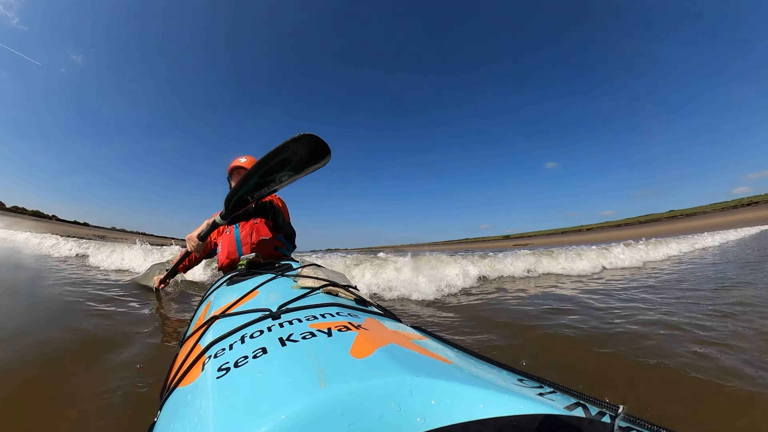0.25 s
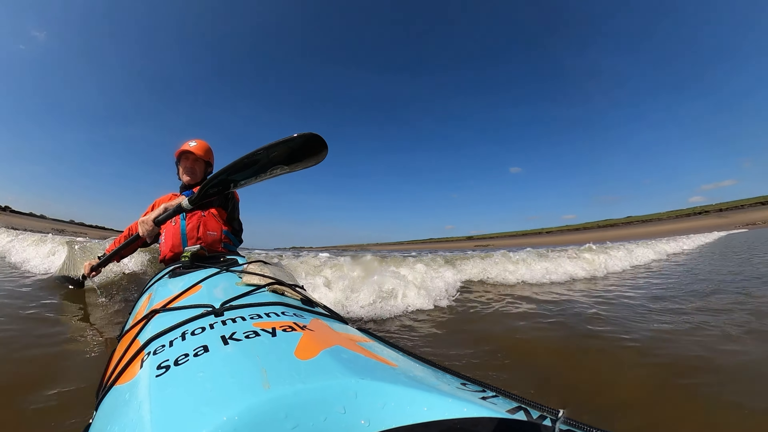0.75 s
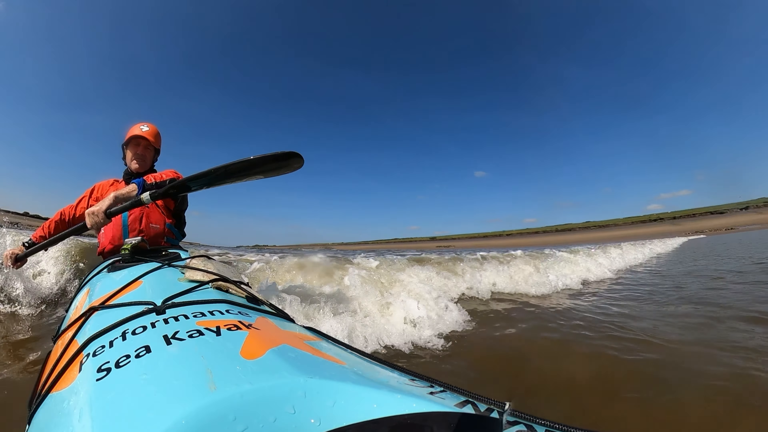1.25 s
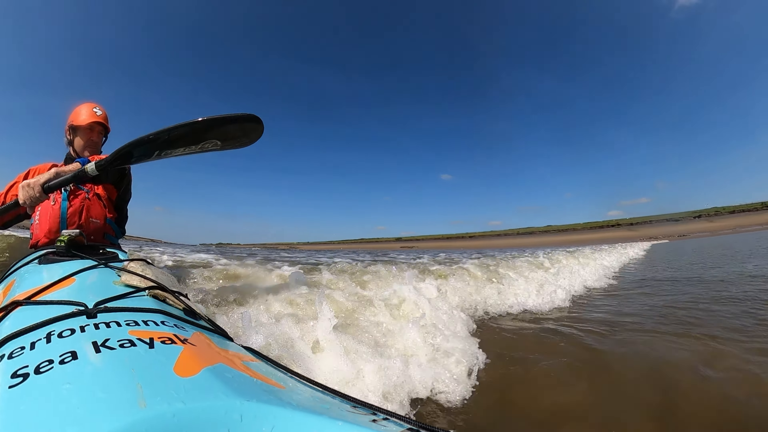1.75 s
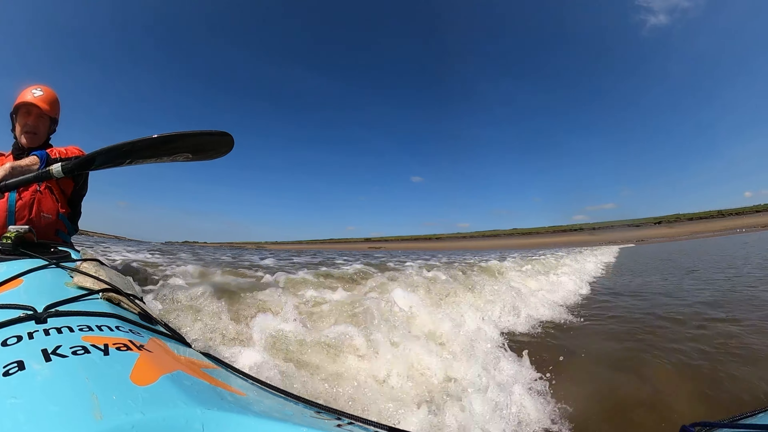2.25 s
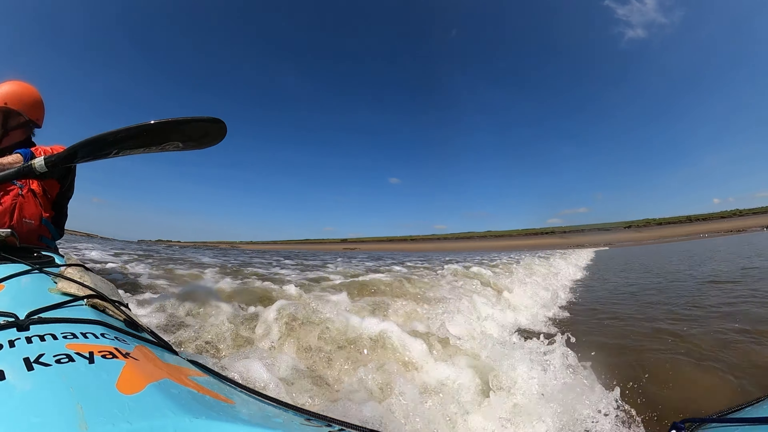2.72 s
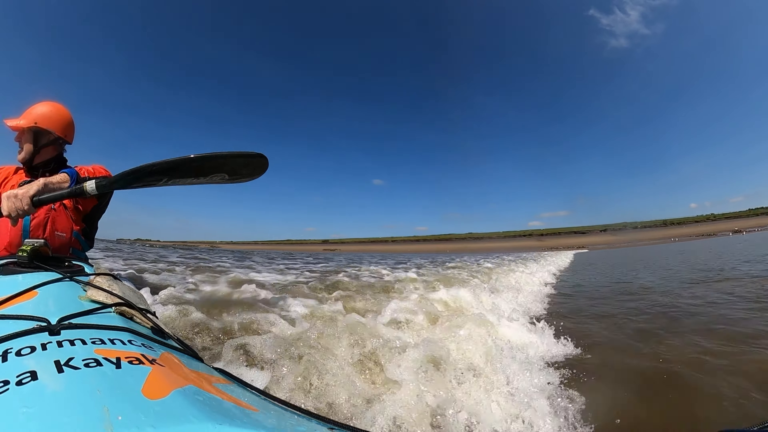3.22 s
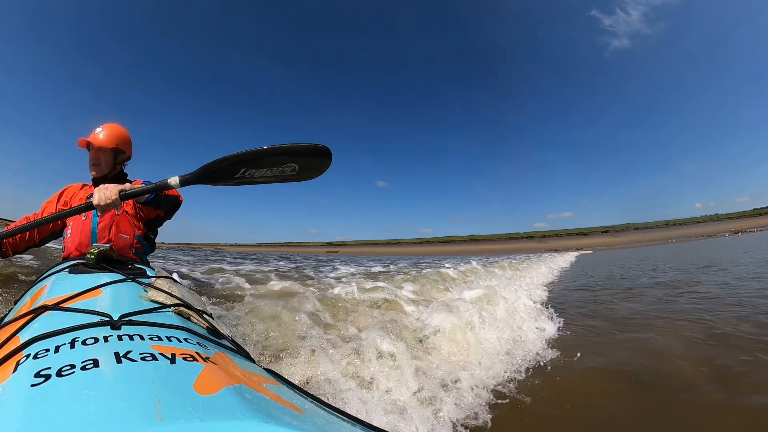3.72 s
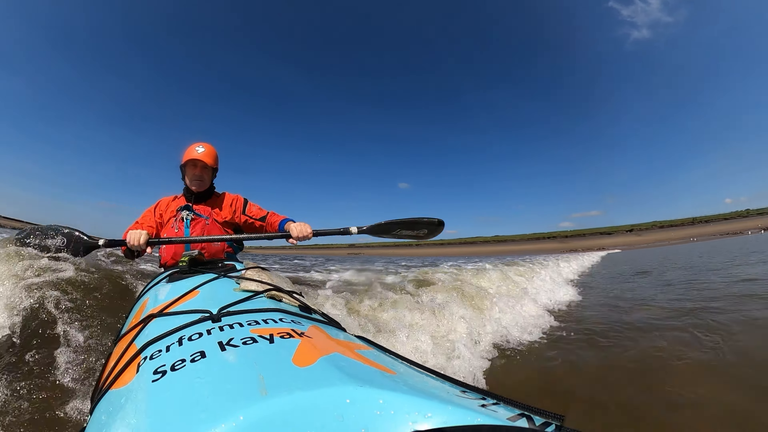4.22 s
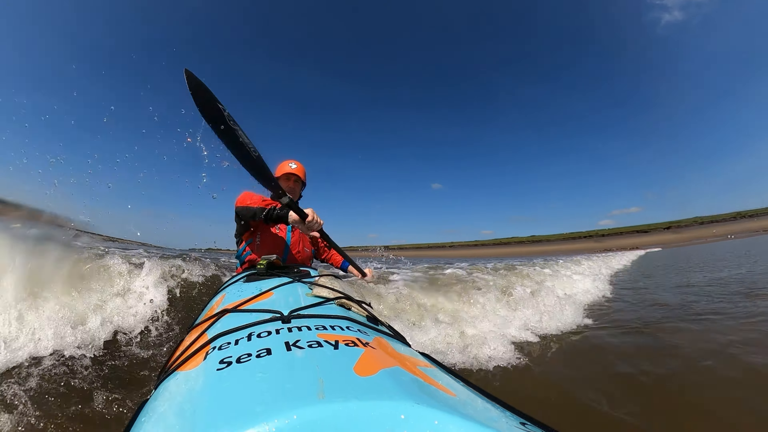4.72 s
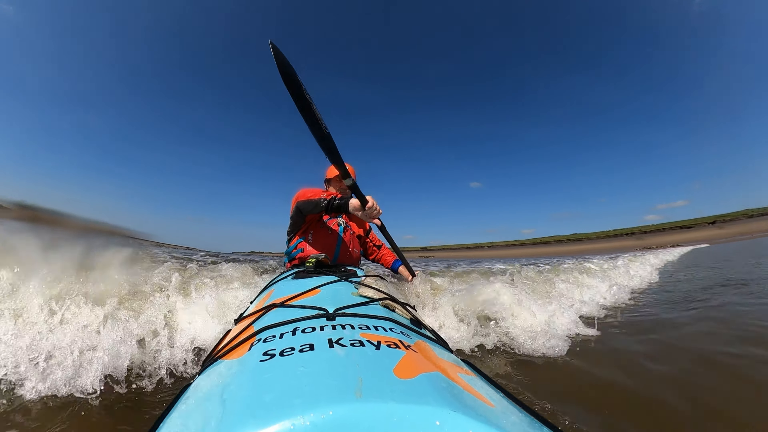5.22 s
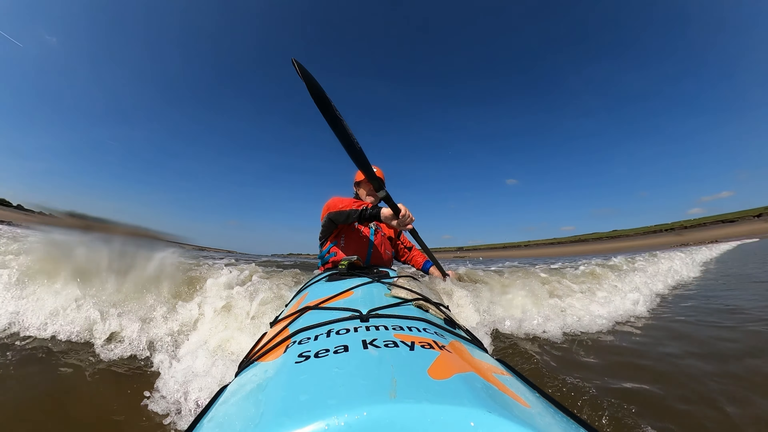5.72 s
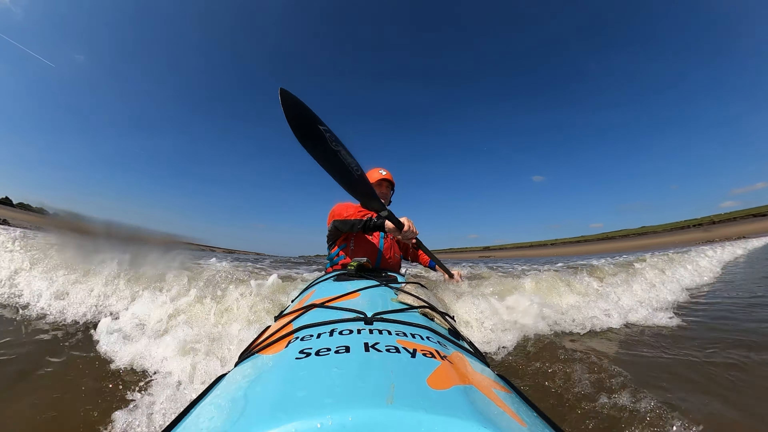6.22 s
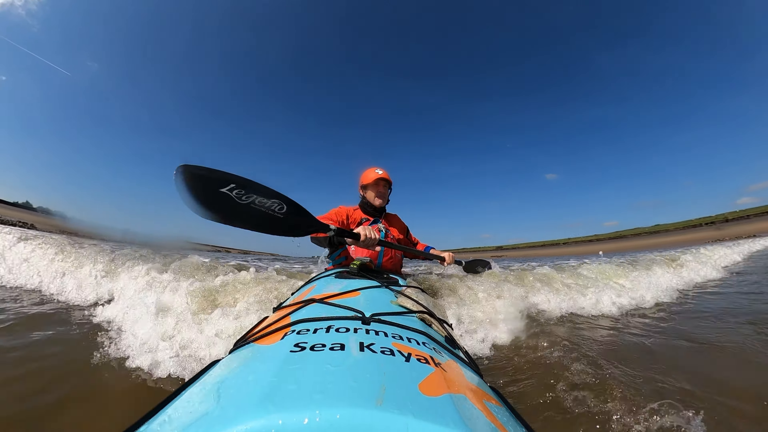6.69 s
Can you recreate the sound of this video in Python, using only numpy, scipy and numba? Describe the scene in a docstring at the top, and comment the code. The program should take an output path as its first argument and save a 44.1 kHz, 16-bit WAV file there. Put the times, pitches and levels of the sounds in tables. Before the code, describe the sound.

A dense, muffled foamy rush surrounds a microphone mounted on a kayak deck. Low bubbling and gurgling grow as the crest passes, with brief splashes and faint fizz, while surf hisses softly beyond. From about three seconds, wind buffeting becomes heavier, with low thuds; the water keeps roaring outdoors until the end.

```python
"""Foam roars from the start, a cloud of ringing bubbles, as a small breaking wave overtakes and carries a sea kayak.
Trapped air churns and gulps beside the hull, damped oscillations of rising pitch; spray fizzes as the crest passes.
Splashes and mist are shorter bubble clouds; drops tick on the wet housing of a microphone on the deck.
Gusts, as coloured noise, and hard eddies, as single damped pulses, buffet that microphone; surf hisses further off."""
import sys
import numpy as np
from scipy import signal
from scipy.fft import rfft, irfft, next_fast_len
from scipy.io import wavfile
from scipy.ndimage import uniform_filter1d
from numba import njit

SR = 44100
rng = np.random.default_rng(int(sys.argv[2]) if len(sys.argv) > 2 else 0)


def store_pcm(level_fs):
    """Save levels as 16-bit WAV."""
    pcm = np.round(np.clip(level_fs, -1, 1) * 32767).astype(np.int16)
    wavfile.write(sys.argv[1], SR, np.atleast_2d(pcm).T)


N = 306495
TIME = np.arange(N) / SR

# spectrum of the surf line further off: (frequency [Hz], relative density [dB])
FAR_SURF_SPECTRUM = [(1500, -5), (2900, -5.5), (4000, -2.5), (4700, -12.5), (5800, -15), (7600, -21.5),
                     (8600, -40)]
# spectrum of the wind buffeting: (frequency [Hz], relative density [dB])
WIND_SPECTRUM = [(6, -17), (14, 0.5), (22, -2.5), (32, -7), (45, -2.5), (62, -6), (90, -8.5), (130, -13),
                 (250, -38), (600, -43.5)]
# gusts on the microphone: (time of height [s], length [s], level at height [dB])
GUST_EVENTS = [(0.16, 0.22, -37.5), (1.43, 0.13, -39), (1.633, 0.22, -32.5), (2.68, 0.15, -33.5),
               (2.978, 0.64, -35), (3.26, 0.21, -29.5), (3.38, 0.23, -30.5), (3.557, 0.6, -36.5),
               (3.861, 0.21, -31.5), (4.03, 0.34, -32.5), (4.284, .15, -26.5), (4.45, 0.24, -29.5),
               (4.69, 0.54, -32.5), (5.738, 0.6, -32), (6.076, 0.18, -30.5), (6.22, 0.33, -30.5),
               (6.43, 0.32, -29.5), (6.6, 0.16, -31.5), (6.78, 0.18, -30.5)]
# single hard eddies: (onset [s], peak before the thump gain [dB], pitch [Hz])
THUMP_EVENTS = [(3.280, -25, 42), (3.407, -21, 52.3), (4.060, -20, 30), (4.277, -22, 42), (4.42, -15, 29.6),
                (4.693, -23, 38), (5.758, -21, 54.6), (6.403, -16.5, 48.5), (6.584, -17, 55.6)]
# drops on the housing, peaks before muffling:
# (onset [s], snap peak [dB], housing peak [dB], ping peak [dB], ping pitch [Hz])
DROP_EVENTS = [(2.2200, -60, -53, -46, 2900), (2.8115, -49, -58, -56, 4400), (2.9428, -40, -45, -46, 3000),
               (2.9503, -48, -52, -46, 3270), (2.995, -65, -33.5, -48, 2630),
               (3.000, -73, -57, -52.5, 3880), (3.9765, -79, -70, -51, 3950), (4.249, -75, -61, -46, 2900)]
# resonances of the housing struck by a drop: (frequency [Hz], decay constant [s], relative peak [dB])
HOUSING_MODES = [(2620, 0.00061, 1.5), (3670, 0.00065, -8), (5900, .0005, -16.5)]
# fine mist off the crest and the lifting paddle blade: (time of height [s], length [s], level [dB])
MIST_EVENTS = [(3.16, .14, -88), (4.43, .12, -82)]
# spectrum of the mist: (frequency [Hz], relative density [dB])
MIST_SPECTRUM = [(3500, 4.5), (6000, -1), (8500, 1), (11500, -11), (13000, -23)]
# water slopping against the hull and off the paddle:
# (time of height [s], length [s], level [dB], bubble pitch [Hz])
SPLASH_EVENTS = [(1.08, .2, -51, 1350), (2.072, 0.17, -48, 1350), (2.21, 0.16, -51, 1610),
                 (2.374, .24, -46.5, 1400), (2.625, 0.1, -44, 1500), (2.716, .12, -45.5, 1540),
                 (2.84, 0.1, -60, 2390), (2.967, 0.19, -45, 1500), (3.123, .14, -59.5, 2280),
                 (3.244, 0.19, -42.5, 1440), (3.563, 0.23, -42.5, 1400), (3.985, .1, -62, 2800),
                 (4.28, 0.26, -62, 2700), (4.351, 0.13, -43, 1240), (4.412, .08, -50, 1500),
                 (4.934, 0.14, -40.5, 1250), (5.436, 0.09, -44, 1380), (5.64, .14, -52, 1600),
                 (6.35, .16, -53, 1550)]
# spectrum of a splash: (multiple of its bubble pitch [1], relative density [dB])
SPLASH_SPECTRUM = [(.6, -9), (1, 6), (1.33, -2.5), (2, -19.5), (2.67, -32), (4, -47)]
# single big air pockets: (time of height [s], envelope peak [dB], pitch at height [Hz])
GULP_EVENTS = [(0.592, -22, 565), (0.615, -27, 818), (0.795, -36.5, 193), (1.004, -31, 184),
               (1.196, -22.5, 592), (2.032, -25.5, 342), (2.101, -30, 430), (2.142, -29, 204),
               (2.418, -21.5, 286), (2.664, -26, 545), (2.694, -24, 395), (2.926, -22.5, 177),
               (3.016, -27, 210), (3.053, -21, 656), (3.145, -32, 380), (3.335, -22.5, 277),
               (3.364, -24, 307), (4.229, -27, 602), (4.313, -24, 282), (4.856, -28, 462),
               (4.969, -25.5, 236), (5.486, -23.5, 218), (5.590, -20, 753), (5.839, -29, 940),
               (6.211, -24, 380), (6.356, -23.5, 260), (6.670, -24, 427), (6.848, -26, 338)]
# fizz of the crest close by: (frequency [Hz], relative density [dB])
SPRAY_SPECTRUM = [(900, -13.5), (1250, -5), (1500, -5.5), (1900, -17.5), (2450, -20.5), (2750, -27),
                  (3050, -27), (3400, -33), (4000, -39.5), (4400, -44), (4900, -47), (5700, -49),
                  (6400, -53.5), (7900, -59.5), (8700, -82)]
# breaking crest drawing near, passing and carrying the boat: (time [s], level [dB])
CREST_LEVEL = [(0, -54.5), (0.5, -56), (1.3, -53.5), (1.9, -51.5), (2.2, -50), (2.95, -48.5), (3.3, -50),
               (3.75, -53), (4.25, -50.4), (4.7, -52.5), (5.1, -52.5), (5.5, -52.5), (6.4, -51.5),
               (6.95, -54)]
# big air pockets churning beside the hull, before the churn gain: (time [s], level [dB])
CHURN_LEVEL = [(0, -35), (0.5, -35), (1.8, -30.5), (2.1, -27), (2.45, -29.5), (2.65, -26), (2.95, -27.5),
               (3.55, -29.5), (4.0, -28), (4.85, -31), (5.5, -29.5), (5.9, -30.0), (6.25, -27), (6.65, -30),
               (6.95, -30.5)]
# parts of the crest that topple: (time of height [s], length [s], change in roar level [dB])
TUMBLE_EVENTS = [(0.6, .14, 0), (1.16, .14, -0.5), (1.67, 0.097, 2), (1.955, 0.17, 2.5), (2.27, .3, 0.6),
                 (2.64, 0.24, 3.7), (3.06, 0.12, 2.3), (3.27, 0.11, 1.5), (4.05, 0.25, 1), (5.46, .14, 1.3),
                 (5.94, 0.23, 0.5)]
# spectrum of the whitewater through the wet housing: (frequency [Hz], relative density [dB])
WHITEWATER_SPECTRUM = [(60, -22), (110, -6.5), (150, 0), (215, 0.6), (310, 0.5), (520, -0.6), (750, -2.5),
                       (970, -4.5), (1200, -10.5), (1480, -17.5), (1700, -29.5), (2100, -32.5),
                       (3000, -62.5)]

CREST_RIDING_DB = -53  # reference: the crest while the boat rides it
ROAR_DB, ROAR_GROWTH = -34, 0.3  # roar at that reference; dB gained per dB of the crest
SPRAY_DB, SPRAY_GROWTH = -46.5, 1.37  # the same for the spray, which carries only a short way
CHURN_GAIN_DB = -4
BREEZE_DB, BREEZE_RISE_DB_PER_S = -43.5, 1  # air between gusts, freshening as the boat gathers speed
TOP_HZ = 13500  # top of the band kept


def undb(db):
    """Logarithmic scale: decibels to amplitude gain."""
    return 10 ** (np.asarray(db) / 20)


def unit(x):
    """Power normalization: scale to rms 1."""
    return x / np.sqrt(np.mean(x ** 2))


def peak(x, db):
    """Peak normalization: scale the largest excursion to a level."""
    return undb(db) * x / np.abs(x).max()


def steady(x, span_s):
    """Automatic gain: divide by the running rms over this span."""
    return x / np.sqrt(uniform_filter1d(x ** 2, int(span_s * SR)))


def level_over_time(table):
    """Linear interpolation of (time, level) points at every sample."""
    times, levels = np.transpose(table)
    return np.interp(TIME, times, levels)


def swell(s, length_s):
    """Raised-cosine envelope: a smooth rise and fall, 1 at time s."""
    return np.cos(np.pi * np.clip((TIME - s) / length_s, -.5, .5)) ** 2


def walk(rate):
    """Random modulation: Gaussian levels drawn at this rate [Hz], joined by slopes; rms 1."""
    hold = int(SR / rate)
    steps = np.repeat(rng.standard_normal(N // hold + 1), hold)
    return unit(uniform_filter1d(steps, hold)[:N])


def cut(x, hz, kind, order):
    """Butterworth filtering: a passband free of ripple."""
    return signal.sosfilt(signal.butter(order, hz, kind, fs=SR, output="sos"), x)


def colour(x, points):
    """Spectral shaping by (Hz, dB) points on a log-frequency axis; rms 1."""
    hz, db = np.transpose(points)
    size = next_fast_len(N)
    bins = np.maximum(np.fft.rfftfreq(size, 1 / SR), 1)
    gain = undb(np.interp(np.log(bins), np.log(hz), db, left=-120, right=-120))
    return unit(irfft(rfft(x, size) * gain, size)[:N])


def add(out, s, sound):
    """Superposition: mix a sound in from time s."""
    start = max(int(s * SR), 0)
    out[start:start + len(sound)] += sound[:N - start]


@njit
def ring(starts, hz, cycles, sizes, glide):
    """Bubble resonance: each is a damped sine whose pitch rises as it nears the surface."""
    out = np.zeros(N)
    for k in range(len(starts)):
        first = int(starts[k] * SR)
        length = int(cycles[k] * SR / hz[k])
        size, phase = sizes[k], 0.
        fade = np.exp(-np.log(300) / length)  # falls to 1/300 over its life
        for i in range(min(length, N - first)):
            phase += 2 * np.pi * hz[k] / SR * (1 + glide * i / length)
            size *= fade
            out[first + i] += size * np.sin(phase)
    return out


def foam(low_hz, high_hz, count, cycles, spread_db, rush_db):
    """Superposed bubble resonances of all sizes over turbulent noise; even spectrum within the band."""
    when, pitch, size, life = rng.random((count, 4)).T
    hz = low_hz * (high_hz / low_hz) ** pitch
    scatter_db = -spread_db * np.log(1 - .99 * size)
    sizes = undb(scatter_db) * hz  # the pitch factor evens the spectrum
    bubbles = ring(when * (N - 1) / SR, hz, cycles * (.5 + life), sizes, 0.21)
    rush = cut(rng.standard_normal(N), [low_hz / 2, high_hz], "bandpass", order=4)
    return unit(bubbles) + undb(rush_db) * unit(rush)


def far_surf():
    """Incoherent superposition: many small bubbles of the wave along the beach merge into a fine seethe."""
    seethe = foam(1500, 8800, count=9000, cycles=10, spread_db=2.0, rush_db=0)
    level_db = -73 + .5 * walk(5.4) + .8 * walk(35)
    return colour(seethe, FAR_SURF_SPECTRUM) * undb(level_db)


def wind():
    """Turbulent pressure: eddies push on the microphone; gusts add in power to a light breeze."""
    eddies = steady(colour(rng.standard_normal(N), WIND_SPECTRUM), 0.067)
    breeze = undb(BREEZE_DB + BREEZE_RISE_DB_PER_S * TIME + 0.97 * walk(29))
    gust_power = sum((undb(db) * swell(s, length_s)) ** 2 for s, length_s, db in GUST_EVENTS)
    flutter = undb(0.4 * walk(16))
    return eddies * np.sqrt(breeze ** 2 + gust_power) * flutter


def thumps(decay_cycles=.35, gain_db=-3.0):
    """Heavily damped impulse response: a hard eddy shoves the microphone once and it rebounds."""
    out, t = np.zeros(N), TIME[:SR // 5]
    for s, db, hz in THUMP_EVENTS:
        shove = np.sin(2 * np.pi * hz * t) * t * np.exp(-t * hz / decay_cycles)
        add(out, s, peak(shove, db + gain_db))
    return out


def drops(snap_hz=3400, snap_s=.0001, ping_rise_s=.0003, ping_s=0.002, muffle_hz=8000):
    """Impact excitation: a drop snaps on contact, rings the housing modes and pings in the film of water."""
    out, t = np.zeros(N), TIME[:SR // 20]
    snap = np.sin(2 * np.pi * snap_hz * t) * t * np.exp(-t / snap_s)
    knock = 0
    for hz, decay_s, db in HOUSING_MODES:
        knock = knock + peak(np.sin(2 * np.pi * hz * t) * t * np.exp(-t / decay_s), db)
    for s, snap_db, knock_db, ping_db, hz in DROP_EVENTS:
        ping_envelope = (1 - np.exp(-t / ping_rise_s)) * np.exp(-t / ping_s)
        ping = np.sin(2 * np.pi * hz * t) * ping_envelope
        add(out, s, peak(snap, snap_db) + peak(knock, knock_db) + peak(ping, ping_db))
    return cut(out, muffle_hz, "lowpass", order=4)


def mist():
    """Dense random impacts: droplets patter on the housing, drawn as a cloud of tiny damped sines."""
    patter = foam(3500, 13000, count=4000, cycles=6, spread_db=6, rush_db=-4)
    envelope = sum(undb(db) * swell(s, length_s) for s, length_s, db in MIST_EVENTS)
    return colour(patter, MIST_SPECTRUM) * envelope


def splashes():
    """Air entrainment: each slop is a short burst of one bubble cloud, filtered around its own pitch."""
    bubbles = foam(900, 6000, count=9000, cycles=20, spread_db=4.5, rush_db=-5.0)
    out = np.zeros(N)
    for s, length_s, db, hz in SPLASH_EVENTS:
        spectrum = [(hz * multiple, gain_db) for multiple, gain_db in SPLASH_SPECTRUM]
        out += colour(bubbles, spectrum) * undb(db) * swell(s, length_s)
    return out


def gulps(rise_cycles=1.48, glide_per_s=1.5):
    """Volume resonance: large pockets of trapped air swell and ring briefly, rising in pitch."""
    out, t = np.zeros(N), TIME[:SR // 10]
    for s, db, hz in GULP_EVENTS:
        rise_s = rise_cycles / hz
        pocket = np.sin(2 * np.pi * hz * t * (1 + glide_per_s * (t / 2 - rise_s)))
        envelope = t / rise_s * np.exp(1 - t / rise_s)  # 1 at rise_s
        add(out, s - rise_s, undb(db) * pocket * envelope)
    return out


def nearness():
    """Level difference: how far the crest stands above its riding level, in dB."""
    return level_over_time(CREST_LEVEL) - CREST_RIDING_DB


def spray():
    """High-pitched resonance of tiny bubbles: the crest fizzes, much louder when it is near."""
    fizz = foam(1036, 9000, count=20000, cycles=10, spread_db=3, rush_db=5.5)
    level_db = SPRAY_DB + SPRAY_GROWTH * nearness() + 0.15 * walk(20)
    return colour(fizz, SPRAY_SPECTRUM) * undb(level_db)


def breaker(split_hz=420):
    """Pitch falls with bubble size: small bubbles roar, surging as the wave tumbles; large pockets churn."""
    bubbles = foam(100.9, 2177, count=16000, cycles=11.7, spread_db=2.0, rush_db=1)
    water = colour(bubbles, WHITEWATER_SPECTRUM)

    def band(kind):
        """Cascaded filters: two equal passes, so that the two bands add up to an even response."""
        once = cut(water, split_hz, kind, order=2)
        return steady(cut(once, split_hz, kind, order=2), 0.15)

    churn_db = level_over_time(CHURN_LEVEL) + CHURN_GAIN_DB + 0.69 * walk(18)
    tumbling_db = sum(db * swell(s, length_s) for s, length_s, db in TUMBLE_EVENTS)
    roar_db = ROAR_DB + ROAR_GROWTH * nearness() + tumbling_db + 0.23 * walk(14)
    return band("lowpass") * undb(churn_db) + band("highpass") * undb(roar_db)


def scene():
    """Linear superposition of wind and water at one microphone."""
    air = wind() + thumps()
    small_water = drops() + mist() + splashes() + gulps()
    wave = far_surf() + spray() + breaker()
    return (air + small_water + wave)[None]


def record(dry):
    """Band limitation: an elliptic low-pass removes everything above the top of the band."""
    return signal.sosfilt(signal.ellip(8, .2, 70, TOP_HZ, fs=SR, output="sos"), dry)


dry = scene()
out = record(dry)
store_pcm(out)
```